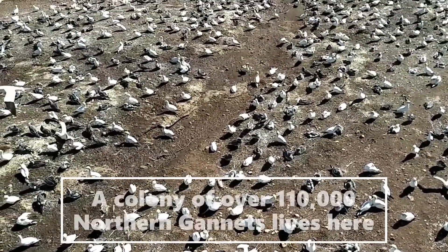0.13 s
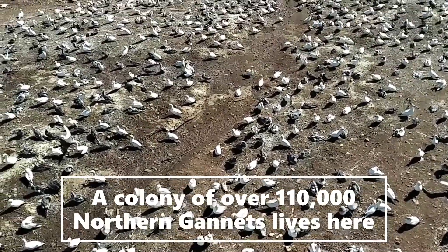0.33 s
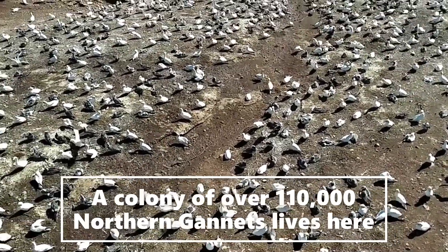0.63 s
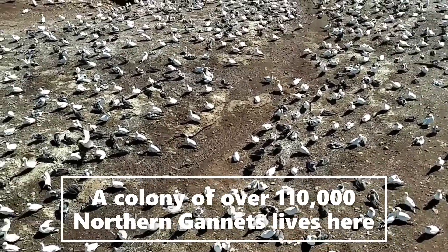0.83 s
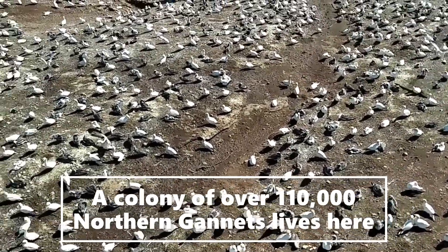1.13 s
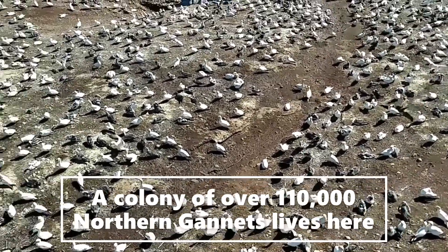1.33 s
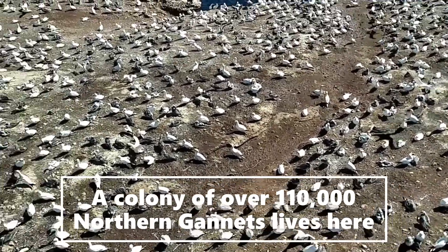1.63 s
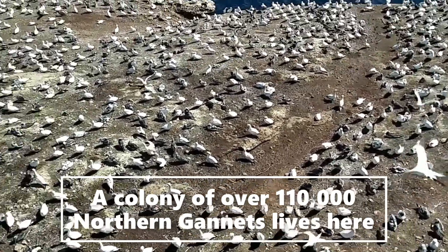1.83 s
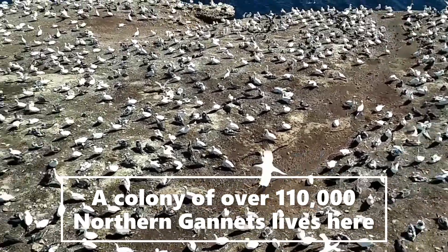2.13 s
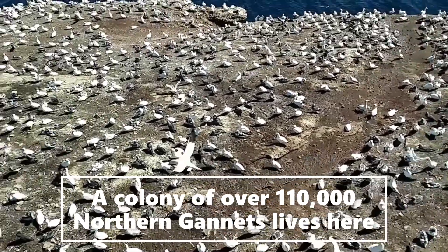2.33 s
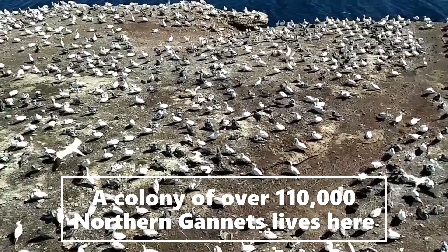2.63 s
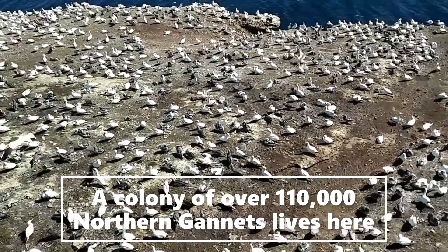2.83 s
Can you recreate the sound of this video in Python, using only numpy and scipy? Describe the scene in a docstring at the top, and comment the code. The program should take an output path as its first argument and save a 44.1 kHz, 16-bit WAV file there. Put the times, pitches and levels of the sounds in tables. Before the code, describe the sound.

A large gannet colony calling in a dense, harsh, rattling roar, with faint wind.

```python
"""Gannets calling in a large colony, heard from above. Each call is a harsh rattle of short voiced
pulses, about 30 a second: buzz and breath shaped by the throat. Pulses, squawks and shrill cries of
the nearest birds stand out of a crowd of calls and scatter off the rock. Thousands of far birds merge
into a roar, and a treble rasp rides on the voices. Light gusts buffet the microphone."""
import sys
import numpy as np
from scipy import signal
from scipy.fft import rfft, irfft
from scipy.io import wavfile
from scipy.ndimage import uniform_filter1d

SR = 44100
rng = np.random.default_rng(int(sys.argv[2]) if len(sys.argv) > 2 else 0)


def digitize_waveform(pressure):
    """Quantize a signal to 16-bit integers and store it at the path in sys.argv[1].

    Rows of a 2-D input are taken as channels; values are limited to [-1, 1].
    """
    field = np.atleast_2d(pressure).T
    bounded = np.clip(field, -1, 1)
    quanta = np.round(bounded * 32767).astype(np.int16)
    wavfile.write(sys.argv[1], SR, quanta)


N = 131859

PITCH_JITTER, PITCH_ARCH, PITCH_FALL = .06, .02487, .0259
ATTACK_S, RELEASE_S, THROAT_DELAY_S = .0018, .0047, .003064
RING_WIDTH_HZ, RING_DB = 298, 1
# Throat response: f/Hz, level/dB
THROAT = [(200,-49),(400,-40),(560,-30.5),(950,-14.5),(1550,-12.5),(1950,-2),(2550,-1),(3200,-5.5),(4150,-7.5),(4600,-22),(6500,-28),(10000,-40.5),(12500,-37.5),(15500,-47)]
def gannet_note(length_s, pitch_hz, ring_hz, rough=.17, throat_scale=1, treble_db=0, size=4096):
    """A buzz that arches and sags in pitch, plus puffs of air, through the throat's resonances."""
    t = np.arange(size) / SR
    wobble = unit(uniform_filter1d(rng.standard_normal(size), size=120))
    along = np.minimum(t / length_s, 1)
    bend = PITCH_ARCH * np.sin(np.pi * along) - PITCH_FALL * (along - .5)
    cycles = np.cumsum(pitch_hz * (1 + PITCH_JITTER * rough * wobble + bend)) / SR
    buzz = np.sinc((cycles % 1 - .5) * SR / pitch_hz)
    puffs = rng.standard_normal(size) * np.sin(np.pi * cycles) ** 2
    drive = (1 - rough) * unit(buzz - buzz.mean()) + rough * unit(puffs)
    hz = np.fft.rfftfreq(size, 1 / SR)
    ring = 1 + amp(RING_DB) / (1 + 2j * (hz - ring_hz) / RING_WIDTH_HZ)
    throat = amp(spectrum_db(THROAT, hz / throat_scale) + treble_db * treble_share(hz)) * ring
    delay_s = THROAT_DELAY_S * abs(throat) / abs(throat).max()  # strong bands linger
    lag = np.exp(-2j * np.pi * np.cumsum(delay_s) * hz[1])
    gate = np.clip(t / ATTACK_S, 0, 1) * np.clip((length_s - t) / RELEASE_S + .5, 0, 1)
    voice = irfft(rfft(drive) * throat * lag, size) * gate
    return unit(voice) * np.sqrt(np.mean(gate ** 2))


NEAR_DB = -1
# Rattle pulses: t/s, length/s, level/dB re NEAR_DB, pitch/Hz, resonance/Hz
NEAR_PULSES = [(.008,0.017,-12.5,477,2820),(0.043,0.015,-12,472,2970),(0.19,0.011,-16,530,3700),(0.217,0.01,-13,531,2130),(0.257,0.016,-13,480,2400),(0.29,0.016,-14,436,2630),(0.331,0.0073,-11.5,451,2680),(0.360,0.014,-11.5,442,2530),(0.398,0.017,-13.5,449.5,2690),(0.423,0.017,-14,465,2280),(0.443,0.023,-16,455,2180),(0.474,0.019,-14.5,469.6,1910),(0.539,0.011,-15.5,503,2000),(0.577,0.01,-12.5,440,2700),(0.614,0.014,-12.5,485,2470),(0.66,0.013,-17.5,449,2750),(.686,0.015,-13.5,439.4,2620),(0.721,0.012,-12.5,462,2700),(0.902,0.014,-15,478,2350),(0.957,0.014,-16.5,506.5,2480),(1.039,0.0081,-12,562,2720),(1.07,0.017,-15.5,466,2920),(1.13,0.02,-18,516,2500),(1.403,0.019,-14,470,1840),(1.544,.008,-17,511,2500),(1.571,0.01,-16,517,2650),(1.602,0.011,-12.5,489,2350),(1.629,0.029,-21,505,2050),(1.697,0.02,-20,481,2480),(1.746,0.0084,-14,453,2160),(2.259,0.011,-16,499,2560),(2.291,0.016,-16.5,474,2870),(2.456,0.013,-16,523,2130),(2.49,0.009,-15,548,3130),(2.555,0.0093,-24,504,2560),(2.638,0.011,-15.5,512,2600),(2.900,0.0058,-12.5,500,2470),(2.976,0.011,-15,536,2670)]
def near_rattles():
    """Loud voiced pulses from the closest nests."""
    out = np.zeros(N)
    for start_s, length_s, db, pitch_hz, ring_hz in NEAR_PULSES:
        add(out, start_s, amp(db + NEAR_DB) * gannet_note(length_s, pitch_hz, ring_hz))
    return out


# Squawks: t/s, length/s, level/dB, pitch/Hz, resonance/Hz, treble boost/dB
SQUAWKS = [(0.067,0.03,-19.5,419,3000,13),(0.221,0.037,-15,453.5,2320,1),(.752,0.084,-20,412,2470,4.5),(1.124,.08,-18,404.7,2470,5.5),(2.66,0.12,-26,482,2410,10.5)]
def near_squawks():
    """Drawn-out, brighter notes from the closest nests."""
    out = np.zeros(N)
    for start_s, length_s, db, pitch_hz, ring_hz, treble_db in SQUAWKS:
        note = gannet_note(length_s, pitch_hz, ring_hz,
                           rough=.19, throat_scale=.99, treble_db=treble_db, size=8192)
        add(out, start_s, amp(db) * note)
    return out


CRY_DB, CRY_PITCH_HZ, CRY_WIDTH_HZ, CRY_JITTER = 5, 510, 230, .01
# Cries: peak t/s, half-width/s, overtone f/Hz, level/dB re CRY_DB
CRIES = [(0.088,0.029,2970,-20.5),(.452,0.0154,4190,-27),(0.457,0.035,2260,-25),(0.696,0.01,2660,-23),(1.165,0.042,4420,-36.5),(1.443,0.012,4280,-26),(1.457,0.015,2850,-26),(1.494,0.03,3610,-26),(1.756,0.026,3690,-28.5),(1.918,0.012,3750,-30),(2.027,0.023,3780,-29.5),(2.57,0.048,2564,-28),(2.643,0.0065,2560,-13.5),(2.942,0.014,3920,-30.5),(2.951,0.0061,2590,-14),(2.982,.01,2620,-19.5)]
def shrill_cries():
    """Clear notes whose narrow resonance picks out one overtone, with faint neighbours."""
    out = np.zeros(N)
    t = np.arange(-2048, 2048) / SR
    for peak_s, half_s, hz, db in CRIES:
        wobble = unit(uniform_filter1d(rng.standard_normal(len(t)), size=200))
        overtone = round(hz / CRY_PITCH_HZ)
        pitch_hz = hz / overtone * (1 + CRY_JITTER * wobble - PITCH_FALL * np.tanh(t / half_s))
        cycles = np.cumsum(pitch_hz) / SR
        note = np.zeros(len(t))
        for k in range(-2, 3):
            gain = 1 / (1 + (k * CRY_PITCH_HZ / CRY_WIDTH_HZ) ** 2)
            note += gain * np.sin(2 * np.pi * ((overtone + k) * cycles + rng.random()))
        add(out, peak_s + t[0], amp(db + CRY_DB) * unit(note) * np.exp(-2 * (t / half_s) ** 2))
    return out


CALLS_PER_S, CALL_S, RATTLE_HZ, PULSE_DUTY = 22, .3, 29.92, .609
CROWD_PITCH_HZ, CROWD_RING_HZ, CROWD_DB, CROWD_SPREAD_DB = 451.7, 2300, -20, 4
def crowd():
    """Overlapping rattles that swell and fade, each with its own pitch, pace, throat and distance."""
    out = np.zeros(N)
    for k in range(int((N / SR + CALL_S) * CALLS_PER_S)):
        when, span, pace, pitch, build, ring, nearness = rng.uniform(-1, 1, 7) * np.sqrt(3)
        start_s = (k + when / 2) / CALLS_PER_S - CALL_S
        rate_hz = RATTLE_HZ * np.exp(.15 * pace)
        ring_hz = CROWD_RING_HZ * np.exp(.1724 * ring)
        pulses = max(int(CALL_S * np.exp(.25 * span) * rate_hz), 2)
        for i in range(pulses):
            arch = np.sin(np.pi * (i + .5) / pulses)
            pitch_hz = CROWD_PITCH_HZ * np.exp(.15 * pitch + PITCH_ARCH * arch)
            note = gannet_note(PULSE_DUTY / rate_hz, pitch_hz, ring_hz, throat_scale=np.exp(.074 * build))
            onset_s = start_s + (i + .07 * rng.standard_normal()) / rate_hz
            add(out, onset_s, amp(CROWD_SPREAD_DB * nearness) * np.sqrt(arch) * note)
    slow_rms = np.sqrt(uniform_filter1d(out ** 2, size=4400) + 1e-20)
    return amp(CROWD_DB) * unit(out / slow_rms)  # evens out swells, keeps the rattle


ECHO_DB, ECHO_T60_S, ECHO_GAP_S = -15, .1, .004
def rock_echo(birds):
    """Short scatter off the rocky ground."""
    t = np.arange(SR // 2) / SR
    tail = rng.standard_normal(len(t)) * np.exp(-np.log(1000) * t / ECHO_T60_S) * (t > ECHO_GAP_S)
    return amp(ECHO_DB) * signal.fftconvolve(birds, tail / np.linalg.norm(tail))[:N]


ROAR_DB, FAR_DB = -19.5, -27
FAR_VOICES, FAR_PITCH_HZ, FAR_GLIDE, FAR_SWELL_DB = 10, 410.3, .045, 8.5
# Far birds' spectrum: f/Hz, level/dB
ROAR_SPECTRUM = [(30,-39),(190,-48),(240,-11),(320,-8),(410,-6.5),(510,-13),(700,-9),(950,-7),(1250,-5),(1650,-2),(2000,0.5),(2550,1.5),(3200,-8),(4000,-13.5),(4900,-26.5),(7000,-56),(10000,-63),(12500,-65),(15500,-54)]
def far_birds():
    """Distant rattles blur into a roar and into gliding notes that come and go."""
    roar = noise(ROAR_SPECTRUM, patch_db=3, flicker_db=-.5)
    voices = np.zeros(N)
    for _ in range(FAR_VOICES):
        hz = FAR_PITCH_HZ * np.exp(FAR_GLIDE * (drift(2200) + rng.standard_normal()))
        buzz = np.sinc((np.cumsum(hz) / SR % 1 - .5) * SR / hz)
        voices += buzz * amp(FAR_SWELL_DB * np.tanh(drift(3000)))
    return amp(ROAR_DB) * roar + amp(FAR_DB) * colour(voices - voices.mean(), ROAR_SPECTRUM)


RASP_DB, RASP_FOLLOW = -.5, .46
SQUEAKS_PER_S, SQUEAK_HALF_S, SQUEAK_SPREAD_DB, SQUEAK_DB = 900, .0039, 2, -4
# Rasp spectrum: f/Hz, level/dB
RASP_SPECTRUM = [(2500,-36),(4200,-2),(5200,3.5),(6500,1.5),(8000,-4.5),(10000,-10),(12700,-4.5),(15500,-30)]
# Rasp envelope: t/s, level/dB
RASP_ENVELOPE = [(0,-34.5),(.085,-37),(.15,-40),(.55,-40),(.7,-37.5),(.98,-40.5),(1.19,-39.5),(1.23,-48),(1.3,-45),(1.36,-35.5),(1.55,-43),(1.6,-36.5),(1.67,-33.5),(1.76,-41.5),(2.02,-34),(2.11,-43),(2.21,-35),(2.37,-43.5),(2.69,-38),(2.8,-43),(2.99,-40.5)]
def rasp(birds):
    """The top of the voices: patchy hiss and tiny squeaks that follow the birds' loudness."""
    squeaks = np.zeros(N)
    t = np.arange(-512, 512) / SR
    low_hz, high_hz = RASP_SPECTRUM[1][0], RASP_SPECTRUM[-1][0]
    for when, height, length, strength in rng.random((int(SQUEAKS_PER_S * N / SR), 4)):
        hz = low_hz + height * (high_hz - low_hz)
        gain = amp(SQUEAK_SPREAD_DB * min(-np.log(1 - strength), 4))
        window = np.exp(-(t / (SQUEAK_HALF_S * (length + .5))) ** 2)
        add(squeaks, when * N / SR + t[0], gain * np.cos(2 * np.pi * hz * t) * window)
    hiss = noise(RASP_SPECTRUM, patch_db=3.5, flicker_db=5)
    texture = unit(hiss + amp(SQUEAK_DB) * colour(squeaks, RASP_SPECTRUM))
    loudness = unit(np.sqrt(uniform_filter1d(birds ** 2, size=260) + 1e-12))
    return amp(RASP_DB) * envelope(RASP_ENVELOPE) * loudness ** RASP_FOLLOW * texture


TREBLE_FOLLOW = .38
# Swell of crowd and far birds: t/s, level/dB
COLONY_SWELL = [(0,0.5),(.31,-2.5),(.48,0),(.59,-3.5),(.66,0),(.92,0),(1,-2),(1.19,0),(1.26,-0.5),(1.66,0),(1.8,0),(2.02,0),(2.11,-2),(2.22,0),(2.38,-2.5),(2.74,-1),(2.88,-3),(2.99,-1.5)]
def colony_swell(voices):
    """Massed voices swell together; their treble brightens and dulls with the rasp."""
    treble = irfft(rfft(voices) * treble_share(np.fft.rfftfreq(N, 1 / SR)), N)
    brightness = unit(envelope(RASP_ENVELOPE) ** TREBLE_FOLLOW)
    return envelope(COLONY_SWELL) * (voices - treble + treble * brightness)


GUST_DB = 2.5
# Gusts: peak t/s, half-width/s, level/dB re GUST_DB
GUSTS = [(0.518,0.039,-34),(0.726,0.018,-25),(0.809,0.026,-28.5),(0.967,0.011,-25.5),(1.046,0.013,-26),(1.1,0.013,-29),(1.332,0.037,-35.5),(1.563,0.022,-34.5),(1.926,0.013,-28),(1.978,0.012,-29),(2.122,0.025,-24.5),(2.3,0.017,-30),(2.406,0.017,-28),(2.808,0.012,-29)]
# Breeze between gusts: t/s, level/dB
BREEZE = [(0,-38),(.14,-47),(.3,-44),(.6,-41.5),(1.1,-37),(1.45,-41.5),(1.6,-42),(1.66,-56),(1.79,-55),(1.86,-35.5),(2.25,-35),(2.99,-35)]
# Buffeting spectrum: f/Hz, level/dB
WIND_SPECTRUM = [(20,-33),(42,-25),(70,-5.5),(120,-0.5),(220,-3),(330,-5),(500,-21),(1000,-38),(4000,-70)]
def wind():
    """Low buffeting on the microphone: gusts over a faint breeze."""
    t = np.arange(N) / SR
    gust_power = sum(amp(db + GUST_DB) ** 2 * np.exp(-((t - peak_s) / half_s) ** 2)
                     for peak_s, half_s, db in GUSTS)
    return np.sqrt(gust_power + envelope(BREEZE) ** 2) * noise(WIND_SPECTRUM)


def amp(db):
    return 10 ** (np.asarray(db) / 20)


def unit(x):
    return x / np.sqrt(np.mean(x ** 2) + 1e-20)


def spectrum_db(spectrum, hz):
    f, db = np.transpose(spectrum)
    return np.interp(np.log(hz + 1), np.log(f), db)


def treble_share(hz, split_hz=3370, width_hz=540):
    return .5 + .5 * np.tanh((hz - split_hz) / width_hz)


def envelope(points):
    """Gain per sample from a dB curve."""
    return amp(np.interp(np.arange(N) / SR, *np.transpose(points)))


def add(mix, start_s, sound):
    """Mixes a sound in, dropping what falls outside."""
    at = round(start_s * SR)
    sound = sound[max(-at, 0):]
    part = mix[max(at, 0):][:len(sound)]
    part += sound[:len(part)]


def drift(step_samples):
    """Slow random wander, unit RMS."""
    knots = np.arange(0, N + step_samples, step_samples)
    return unit(np.interp(np.arange(N), knots, rng.standard_normal(len(knots))))


def colour(x, spectrum):
    """Filters by a spectrum, unit RMS."""
    return unit(irfft(rfft(x) * amp(spectrum_db(spectrum, np.fft.rfftfreq(N, 1 / SR))), N))


def noise(spectrum, patch_db=0, flicker_db=0):
    """Coloured noise with small random patches and a flicker shared by all bands."""
    _, _, cells = signal.stft(rng.standard_normal(N), SR, nperseg=512, noverlap=384)
    patches = uniform_filter1d(rng.standard_normal(cells.shape), size=5, axis=1)
    patches = unit(uniform_filter1d(patches, size=4, axis=0))
    flicker = unit(uniform_filter1d(rng.standard_normal(cells.shape[1]), size=3))
    cells *= amp(patch_db * patches + flicker_db * flicker)
    return colour(signal.istft(cells, nperseg=512, noverlap=384)[1][:N], spectrum)


def scene():
    """Near birds and crowd with their echo, far roar, rasp and wind; mono."""
    birds = near_rattles() + near_squawks() + shrill_cries() + colony_swell(crowd())
    roar = colony_swell(far_birds())
    return (birds + rock_echo(birds) + roar + rasp(birds) + wind())[None]


BAND_LIMIT_HZ = 15650
def record(dry):
    """The recorder's band limit."""
    lowpass = signal.firwin(511, BAND_LIMIT_HZ, window=("kaiser", 9), fs=SR)
    return signal.oaconvolve(dry, lowpass[None], "same")


dry = scene()
out = record(dry)
digitize_waveform(out)
```